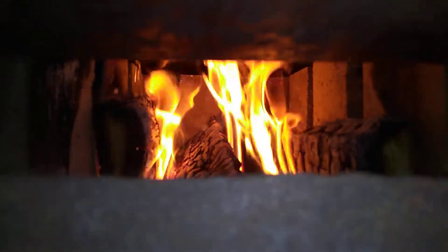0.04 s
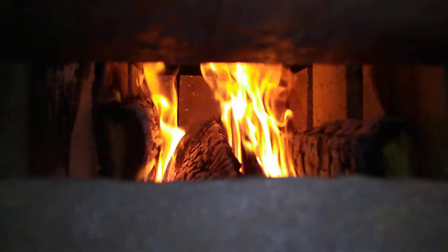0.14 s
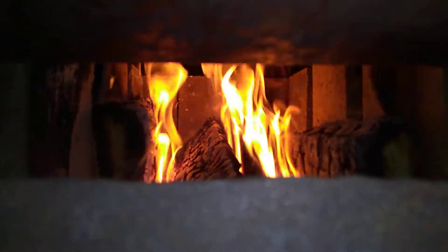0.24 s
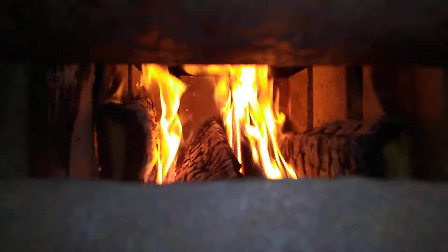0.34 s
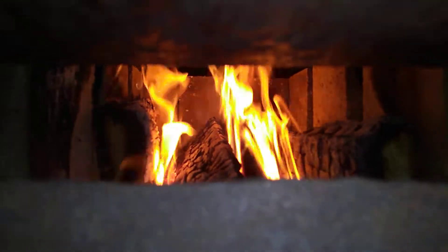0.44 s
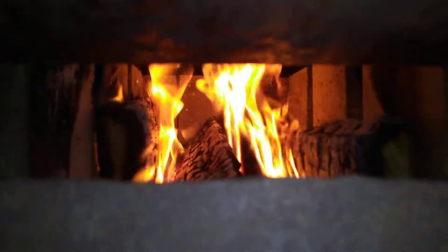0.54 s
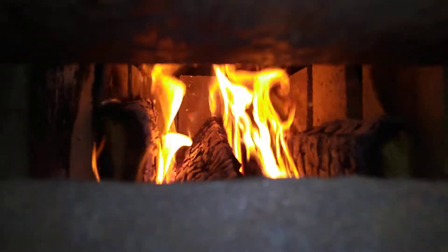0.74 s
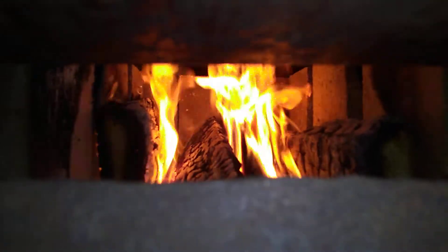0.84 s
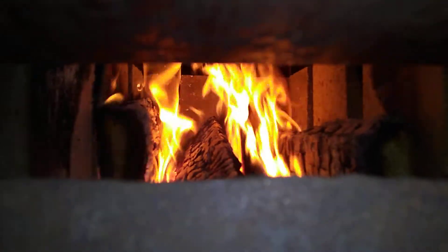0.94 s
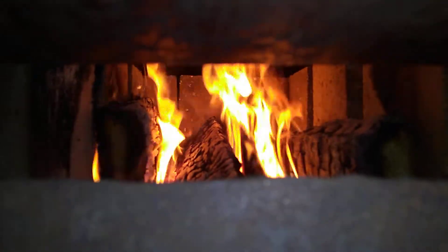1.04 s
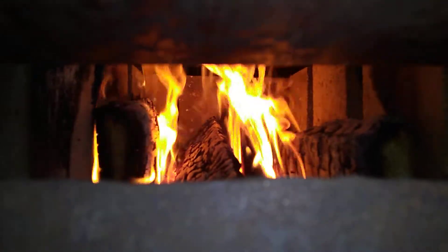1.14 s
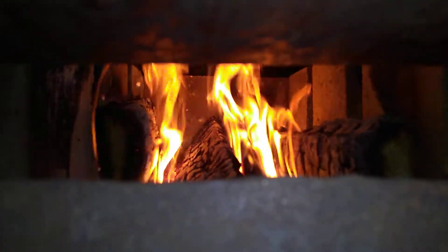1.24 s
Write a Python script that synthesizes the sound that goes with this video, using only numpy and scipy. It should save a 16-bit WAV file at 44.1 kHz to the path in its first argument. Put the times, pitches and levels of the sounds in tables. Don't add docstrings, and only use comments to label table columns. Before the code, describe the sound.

Burning logs crackle in an iron boiler, one very loud sharp snap over faint low rumble

```python
import sys
import numpy as np
from scipy import signal
from scipy.fft import rfft, irfft
from scipy.io import wavfile

SR = 44100
rng = np.random.default_rng(int(sys.argv[2]) if len(sys.argv) > 2 else 0)


def bounce(signal):
    frames = np.transpose(np.atleast_2d(signal))
    limited = np.clip(frames, -1, 1)
    pcm = np.round(limited * 32767).astype(np.int16)
    wavfile.write(sys.argv[1], SR, pcm)


def decibels_to_gain(level_db):
    exponent = np.asarray(level_db, float) / 20
    return 10 ** exponent


N = 57330
BURST_SIZE = 4000


def rms_one(x):
    return x / np.sqrt(np.mean(x ** 2) + 1e-20)


def fade(t60, size):
    return decibels_to_gain(-60 * np.arange(size) / SR / t60)


def drift(rate_hz):
    r = np.exp(-2 * np.pi * rate_hz / SR)
    settle = 9000
    wander = signal.lfilter([1], [1, -2 * r, r * r], rng.standard_normal(N + settle))
    return rms_one(wander[settle:])


def colour(x, points):
    size = 4096
    half = size // 2
    hz, db = np.transpose(points)
    bin_hz = np.arange(half + 1) * SR / size
    gain_db = np.interp(np.log(bin_hz + 1), np.log(hz), db, left=db[0] - 42.5, right=-70)
    cepstrum = irfft(gain_db * np.log(10) / 20)
    cepstrum[1:half] *= 2
    cepstrum[half + 1:] = 0
    response = irfft(np.exp(rfft(cepstrum)))
    return signal.fftconvolve(x, response)[:len(x)]


def tint(plain, raw, hz, q, db):
    b, a = signal.iirpeak(min(hz, 16000), q, fs=SR)
    ring = signal.lfilter(b, a, signal.lfilter(b, a, raw))
    both = plain / np.abs(plain).max() + decibels_to_gain(db) * ring / np.abs(ring).max()
    return both / np.abs(both).max()


def snaps():
    # start_s [s], peak_db [dB], pitch_hz [Hz], tint_db [dB]
    snap_events = [(0.0246, -48.5, 10300, 11), (0.075, -60, 10200, 6), (0.087, -59, 10900, 18.5),
                   (0.1643, -48, 5860, -7), (0.168, -47.5, 11000, 4.5), (0.2081, -44.5, 9000, -17.5),
                   (.2270, -44, 9500, 8), (.2300, -33, 9500, 8), (.2337, -6.5, 9500, 0),
                   (.8916, -18, 10000, -2), (.872, -44, 8000, 0), (.0453, -43, 9800, 6),
                   (.1198, -33, 11300, 0), (0.282, -48, 6500, 10), (0.352, -44, 10800, -5),
                   (0.5042, -69, 14600, 6), (0.5316, -50, 9500, -13), (0.612, -53, 6630, 14),
                   (0.6224, -40.5, 12140, -3), (.780, -64, 9040, 5), (0.8236, -61, 12980, 3),
                   (0.8485, -32.5, 11310, 5), (0.8865, -31, 12200, -19), (1.0972, -27, 10650, 36.5),
                   (1.124, -54, 6500, 28), (1.1304, -34.5, 11600, 12.5), (1.147, -44.5, 8500, 38),
                   (1.189, -35, 9160, 13), (1.1966, -25.5, 12680, 22.5), (1.218, -38.5, 8920, -19),
                   (1.273, -58, 8250, -15)]
    # pitch_hz [Hz], level_db [dB per Hz]
    snap_colour = [(2060, -58), (3500, -52), (4660, -21.5), (5000, -22), (7620, -20), (10300, -12.5),
                   (13500, -31.5), (15600, -32), (16500, -45.5)]
    hold_s, t60_s = 0.0012, 0.026
    crack_db, crack_s = 6.0, 0.00018
    spit_db, spit_step = 1.5, 25
    tint_q, extra_tint_db = 3.0, 5.7

    out = np.zeros(N + BURST_SIZE)
    t = np.arange(BURST_SIZE) / SR
    dying_db = -60 * np.maximum(t - hold_s, 0) / t60_s
    shape = decibels_to_gain(dying_db + crack_db * np.exp(-t / crack_s))
    for start_s, peak_db, pitch_hz, tint_db in snap_events:
        gas = rng.standard_normal(BURST_SIZE)
        spit = np.repeat(rng.standard_normal(BURST_SIZE // spit_step), spit_step)
        burst = gas * shape * decibels_to_gain(spit_db * spit)
        snap = tint(colour(burst, snap_colour), burst, pitch_hz, tint_q, tint_db + extra_tint_db)
        out[int(start_s * SR):][:BURST_SIZE] += decibels_to_gain(peak_db) * snap
    only_bright = signal.butter(6, 4700, "high", fs=SR, output="sos")
    return signal.sosfilt(only_bright, out[:N])


def splits():
    # start_s [s], peak_db [dB]
    split_events = [
        (.2338, -1.5),
        (.8916, -16),
    ]
    # pitch_hz [Hz], level_db [dB], t60_s [s]
    split_pitches = [
        [(5110, -25, .02), (5970, -19, .02), (7150, -14, .015), (8070, -12, .018), (8760, -11, .02),
         (9300, -3, .024), (10220, 0, .02), (10880, -4, .018), (11600, -10, .016), (12650, -15, .015)],
        [(1450, -15, .04), (2440, -18, .04), (4700, -15, .02), (6050, -12, .025), (7380, -7, .025),
         (8600, -9, .03), (9510, 0, .025), (10220, -8, .02), (10650, -9, .018), (14700, -14, .015)],
    ]
    tear_s = 0.0014

    out = np.zeros(N + BURST_SIZE)
    tear_shape = np.exp(-np.arange(BURST_SIZE) / SR / tear_s)
    for (start_s, peak_db), pitches in zip(split_events, split_pitches):
        ringing = np.zeros(BURST_SIZE)
        for pitch_hz, level_db, t60_s in pitches:
            tear = rng.standard_normal(BURST_SIZE) * tear_shape
            r = decibels_to_gain(-60 / t60_s / SR)
            swing = [1, -2 * r * np.cos(2 * np.pi * pitch_hz / SR), r * r]
            ring = signal.lfilter([1, -2, 1], swing, tear + 1e-18)
            ringing += decibels_to_gain(level_db) * ring / np.abs(ring).max()
        out[int(start_s * SR):][:BURST_SIZE] += decibels_to_gain(peak_db) * ringing / np.abs(ringing).max()
    return out[:N]


def knocks():
    # start_s [s], level_db [dB], pitch_hz [Hz], ring_db [dB]
    knock_events = [(0.075, -93, 930, 1), (0.121, -60.5, 507, -11), (.234, -39, 729.5, -22),
                    (.5, -96, 810, 3), (.755, -67.5, 324.6, 17.5), (.759, -76.5, 896, 2),
                    (0.8915, -43.5, 495, -15), (.8925, -48, 2286, -15), (.97, -63, 652, -4.5),
                    (1.02, -63, 334, 7), (1.105, -76, 521, 4.5), (1.188, -70, 3300, 4)]
    # pitch_hz [Hz], level_db [dB per Hz]
    knock_colour = [(250, -13.5), (600, -4.5), (1100, -13.5), (1500, -11), (2400, -12), (3300, -19.5),
                    (4600, -11), (6500, -23.5)]
    t60_s, extra_db, ring_q = 0.047, 10, 6.0

    out = np.zeros(N + BURST_SIZE)
    for start_s, level_db, pitch_hz, ring_db in knock_events:
        burst = rng.standard_normal(BURST_SIZE) * fade(t60_s, BURST_SIZE)
        knock = tint(colour(burst, knock_colour), burst, pitch_hz, ring_q, ring_db)
        out[int(start_s * SR):][:BURST_SIZE] += decibels_to_gain(level_db + extra_db) * knock
    return out[:N]


def thumps():
    # start_s [s], peak_db [dB], pitch_hz [Hz], t60_s [s]
    thump_events = [
        (0.241, -36.5, 144.8, 0.18),
        (0.784, -46, 107, 0.05),
        (0.886, -30.5, 87.6, .12),
        (0.889, -15.5, 190, 0.023),
        (0.914, -29.5, 118.8, 0.12),
    ]
    rise_s = 0.003
    out = np.zeros(N)
    for start_s, peak_db, pitch_hz, t60_s in thump_events:
        t = np.maximum(np.arange(N) / SR - start_s, 0)
        swell = 1 - np.exp(-t / rise_s)
        out += decibels_to_gain(peak_db - 60 * t / t60_s) * swell * np.sin(2 * np.pi * pitch_hz * t)
    return out


def sizzle():
    # time_s [s], level_db [dB]
    sizzle_levels = [(0, -66), (.11, -68), (.22, -71), (.33, -66), (.36, -60), (.47, -66), (.52, -72),
                     (.66, -75), (.75, -81), (.81, -76), (.846, -56), (.888, -54), (.95, -61), (1.08, -72),
                     (1.14, -60), (1.18, -65), (1.23, -65), (1.3, -67)]
    # pitch_hz [Hz], level_db [dB per Hz]
    hiss_colour = [(3000, -55), (4600, -32), (5500, -16), (7500, -9), (9500, -1), (11500, -3), (15500, -2),
                   (16500, -30)]
    ticks_per_s, tick_db, tick_t60_s = 90, -4.0, 0.03
    flicker_db, flicker_hz = 4.5, 10

    tick_size = decibels_to_gain(3.5 * np.minimum(rng.exponential(1, N), 3))
    tick_starts = (rng.random(N) < ticks_per_s / SR) * tick_size
    ticks = signal.lfilter([1], [1, -decibels_to_gain(-60 / tick_t60_s / SR)], tick_starts)

    hiss = np.zeros(N)
    band_edges = np.geomspace(3000, 17000, 30)
    for low_high in zip(band_edges, band_edges[1:]):
        band_filter = signal.butter(2, low_high, "band", fs=SR, output="sos")
        band = signal.sosfilt(band_filter, rng.standard_normal(N))
        hiss += decibels_to_gain(flicker_db * drift(flicker_hz)) * band

    time_s, level_db = np.transpose(sizzle_levels)
    loudness = decibels_to_gain(np.interp(np.arange(N) / SR, time_s, level_db))
    return loudness * rms_one(colour(hiss, hiss_colour)) * (1 + decibels_to_gain(tick_db) * ticks)


def draught():
    # pitch_hz [Hz], level_db [dB per Hz]
    roar_colour = [(12, -52), (20, -28.5), (48, -4), (119, 0.5), (242, -19), (318, -19), (436, -39.5),
                   (516, -44.5), (3000, -60), (3900, -82), (6600, -120)]
    level_db, flutter_db, flutter_hz = -51, 1.0, 12
    settle = 5000
    roar = colour(rng.standard_normal(N + settle), roar_colour)[settle:]
    return decibels_to_gain(level_db + flutter_db * drift(flutter_hz)) * rms_one(roar)


def tail(x, level_db, t60):
    ring = rng.standard_normal(N) * fade(t60, N)
    ring = ring / np.sqrt(np.sum(ring ** 2))
    return decibels_to_gain(level_db) * signal.fftconvolve(x, ring)[:N]


def firebox(bright):
    b, a = signal.iirpeak(9600, 2.5, fs=SR)
    return signal.lfilter(b, a, tail(bright, level_db=-8.5, t60=0.13))


def room(bright, knock):
    return tail(bright, level_db=-21, t60=0.5) + tail(knock, level_db=-7, t60=0.36)


def scene():
    bright, knock = snaps(), knocks()
    bursts = bright + splits() + knock + thumps()
    ringing = firebox(bright) + room(bright, knock)
    return (bursts + ringing + sizzle() + draught())[None]


def band_limit(x):
    return signal.sosfilt(signal.butter(12, 16810, fs=SR, output="sos"), x)


def record(dry):
    top_cut = signal.cheby2(12, 60, 16700, fs=SR, output="sos")
    mix = signal.sosfilt(top_cut, dry)
    return band_limit(mix)


dry = scene()
out = record(dry)
bounce(out)
```